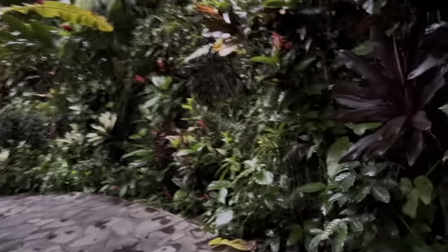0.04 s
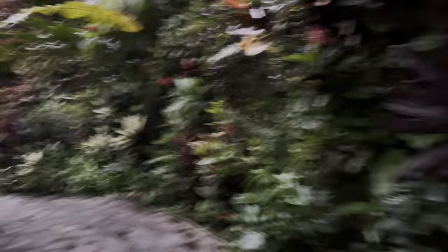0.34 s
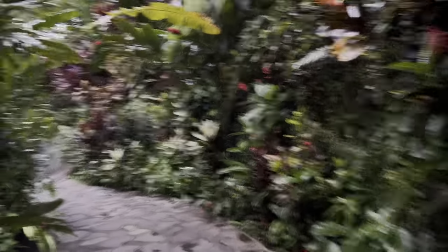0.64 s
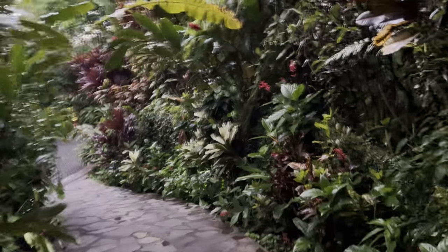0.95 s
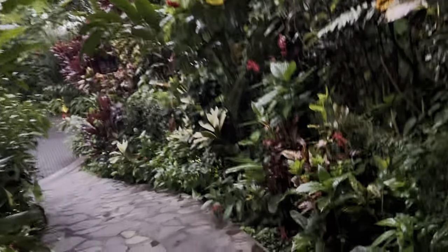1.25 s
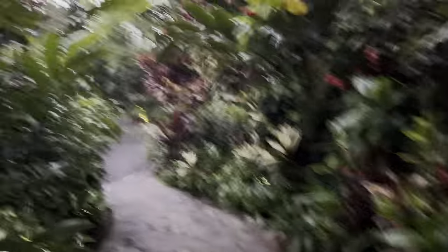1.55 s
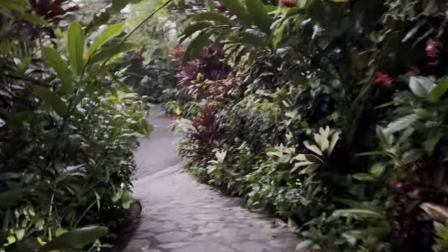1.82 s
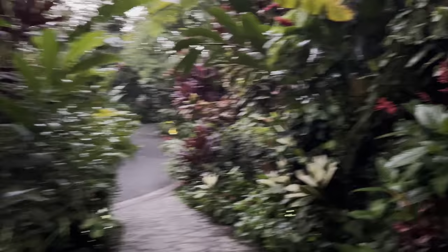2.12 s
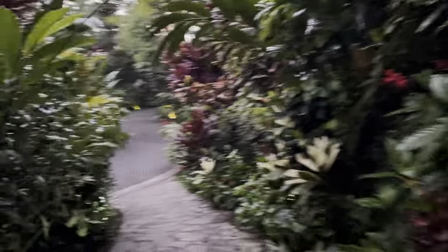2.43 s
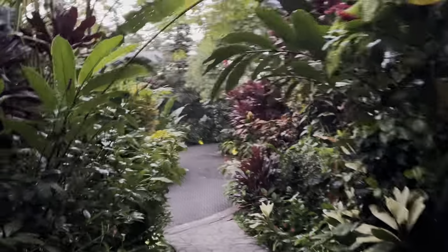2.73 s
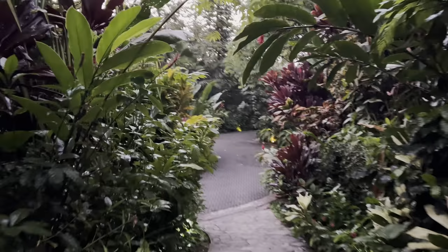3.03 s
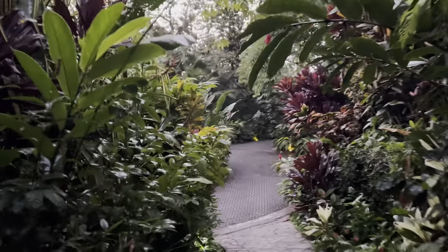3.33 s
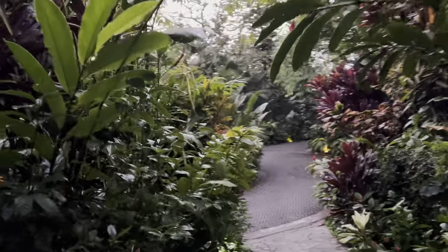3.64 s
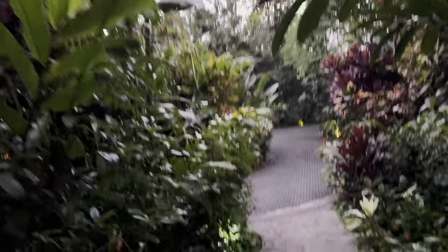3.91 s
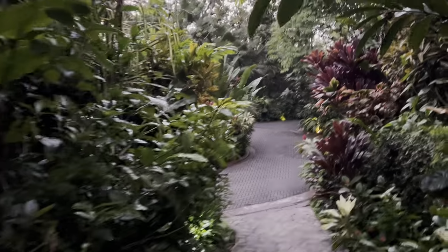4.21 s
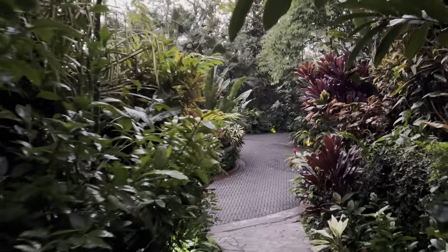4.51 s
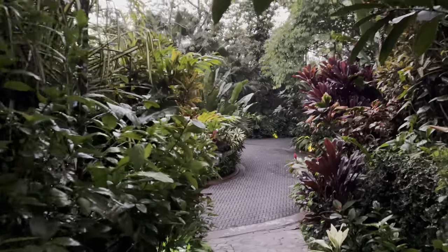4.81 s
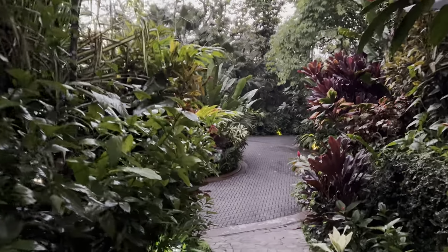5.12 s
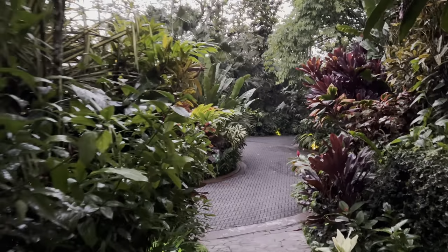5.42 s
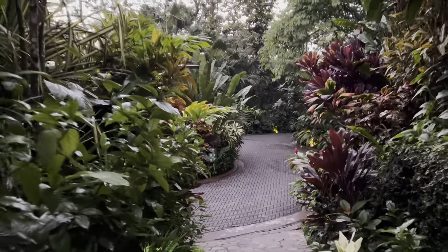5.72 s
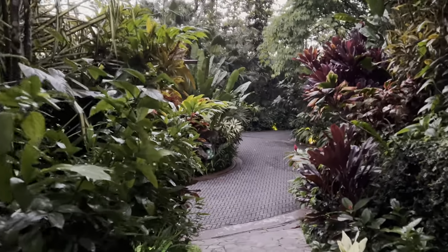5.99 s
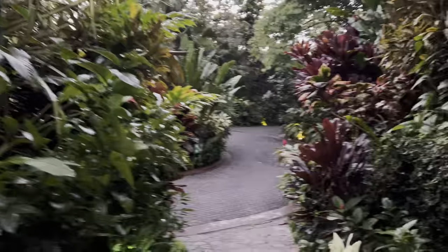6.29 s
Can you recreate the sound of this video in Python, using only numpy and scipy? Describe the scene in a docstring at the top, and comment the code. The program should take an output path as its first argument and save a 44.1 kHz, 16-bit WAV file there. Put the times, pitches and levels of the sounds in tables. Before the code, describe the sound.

A howler monkey roars once in a tropical garden, over a pulsing cicada, small bird chirps and light footsteps on paving.

```python
"""A stroll along a paved path in a tropical garden. From the start a cicada pulses over murmuring air and
far crickets, small birds chip and whistle, and light steps click and scuff. A hand bumps the camera,
then a katydid joins in. Near 4 s a howler monkey roars once: a clean hoot swells and sags, breaks into
a rasp and ends in two short groans, hoots and rasps ringing the same throat. The foliage scatters the
roar and every bird call. A few more chirps and one last soft bump close the scene."""
import sys
import numpy as np
from scipy import signal
from scipy.fft import rfft, irfft, next_fast_len
from scipy.io import wavfile
from scipy.ndimage import uniform_filter1d, map_coordinates

SR = 44100
rng = np.random.default_rng(int(sys.argv[2]) if len(sys.argv) > 2 else 0)


def bounce(signal):
    """Save signal as a 16-bit WAV file at the path given by the first command-line argument."""
    frames = np.transpose(np.atleast_2d(signal))
    limited = np.clip(frames, -1, 1)
    pcm = np.round(limited * 32767).astype(np.int16)
    wavfile.write(sys.argv[1], SR, pcm)


N = 280035

# stereo image of the noise layers: freq_hz, left_right_correlation
EAR_LIKENESS = [(110, 0.84), (380, 0.27), (2400, 0.082), (9000, 0)]
# tone of the outdoor bed: freq_hz, gain_db
AIR_EQ = [(20, -37), (58, 1.5), (100, -5.5), (200, -6), (400, -15.5), (2300, -14.5), (3900, -33.5)]
# drone of far crickets: centre_hz, width_hz, level_db
CRICKET_BANDS = [(2650, 91, -62.5)]
# the cicada's three colours, low to high: freq_hz, gain_db
BUZZ_EQ = [(2300, -14), (3200, 6.5), (4900, 8), (5350, 1.5), (5750, 7.5), (6400, 3.5), (7600, -5.5),
           (8400, -2.5), (10500, -53)]
HISS_EQ = [(2000, -8), (3800, 1.5), (5300, -3.5), (5800, -1.5), (7100, -1), (7750, -8.5), (8300, 3),
           (9300, 1.5), (10500, -10.5), (15000, -33)]
SIZZLE_EQ = [(10000, -36), (11300, 6), (13500, 3), (15300, -7)]
# katydid phrases: start_s, length_s, level_db
KATYDID_CUES = [(2.08, 0.14, -56), (3.559, 0.16, -49), (3.792, 0.27, -50), (4.93, 0.28, -51.5),
                (5.22, 0.29, -49)]
# soft knocks on the camera: start_s, level_db, pitch_hz, t60_s, rattle_width_hz
BUMP_CUES = [(1.374, -40, 137, 0.36, 200), (1.49, -48.5, 72.7, 1, 196), (6.321, -29, 184, 1, 670)]
# soles meeting the paving: time_s, click_db, scuff_db
STEP_CUES = [(.413, -37.5, -60), (0.536, -36, -62), (0.649, -40.5, -60), (0.888, -37, -64),
             (0.977, -42, -55.5), (1.523, -27.5, -50.5), (2.081, -33.5, -52), (2.623, -30, -57),
             (3.184, -39.5, -53), (3.685, -40.5, -54), (5.941, -39, -53)]

# contour of each kind of bird call: offset_s, pitch_hz, gain_db
CHIP_SHAPE = [(0, 4300, -9), (.008, 4070, -3), (.028, 3970, -5), (.052, 3930, -12.5)]
SLUR_SHAPE = [(0, 2430, -19), (.032, 3444, -5.5), (.06, 3484, -3.5), (.1, 3535, -0.5), (.125, 3276, -5),
              (.15, 3060, -16)]
FALL_SHAPE = [(0, 4846, -3), (.016, 5150, -4.5), (.028, 4550, -1), (.04, 3670, -1.5), (.07, 3167, -3),
              (.105, 2590, -14)]
ARCH_SHAPE = [(0, 2650, -8.5), (.04, 2860, -6), (.06, 4096, 6), (.072, 4150, 3), (.084, 3653, 1),
              (.097, 3174, 1), (.115, 2900, -6)]
RISE_SHAPE = [(0, 4350, -7.5), (.032, 5320, -1.5), (.052, 5234, -10.5), (.068, 5900, -5), (.08, 7170, -9)]
THIN_SHAPE = [(0, 6990, -2), (.1, 7330, 1), (.19, 7220, -2)]
# where each kind is sung: start_s, gain_db, pitch_ratio
CHIP_CUES = [(0.16, -33.5, 1.002), (0.328, -35.5, 0.94), (0.855, -35.5, 0.97), (3.32, -33, 1),
             (4.892, -31, 0.98), (5.812, -35.5, 0.95), (6.317, -28.5, 1.01)]
SLUR_CUES = [(1.462, -35, 1), (3.469, -32.5, 1), (4.7, -35, 0.97)]
FALL_CUES = [(2.167, -36.5, 0.97), (4.112, -34.5, 0.98)]
ARCH_CUES = [(2.721, -37.5, 1), (5.988, -37.5, 1.03)]
RISE_CUES = [(5.299, -31, 0.98)]
THIN_CUES = [(2.3, -60, 0.98), (3.019, -58.5, 1)]

# still resonances of the monkey's throat and hyoid sac: centre_hz, width_hz, gain_db
THROAT_MODES = [(345, 155, -5), (401, 61, -1), (550, 120, -10), (1330, 95, -10.5), (2070, 180, -19.5)]
# resonances that move with the lips: centre_hz, width_hz, gain_db
MOUTH_MODES = [(819.3, 99, 0.5), (884, 190, -17.5), (1087, 280, -19.5)]
# mouth opening, which retunes those resonances: time_s, freq_ratio
MOUTH_OPENING = [(4.15, 0.98), (4.26, 1.02), (4.35, 0.96), (4.55, 1), (4.66, 0.95), (4.71, 0.998),
                 (5.45, 0.97), (5.49, 0.92)]
# melody of the vocal folds in the hoots: time_s, pitch_hz
HOOT_PITCH = [(4.02, 396), (4.12, 417.1), (4.33, 422.2), (4.42, 412), (4.46, 384.6), (4.56, 378.7),
              (4.7, 305.5), (4.73, 408.4), (5.21, 404.6), (5.225, 271.7), (5.31, 267.6), (5.385, 244),
              (5.42, 413.8), (5.55, 405), (5.575, 377.2), (5.63, 362)]
# voiced notes, ahead of the throat:
# start_s, length_s, level_db, attack_s, release_s, swell_db_per_s, tilt_db_per_octave,
# second_harmonic_db, shimmer_db
HOOT_CUES = [(4.004, 0.43, -20, 0.23, 0.075, 7.5, 0, 2.3, 0.9),
             (4.438, 0.29, -23.5, 0.018, 0.087, 19, -3, -5, 2.5),
             (4.725, 0.36, -39, 0.023, 0.023, 10, -1.5, 4, 3),
             (5.075, 0.15, -30.5, 0.021, 0.085, -67, -2, -5, 1.5),
             (5.222, 0.17, -26, 0.02, 0.062, 11, -11, 4.5, 1.8),
             (5.416, 0.15, -34, 0.027, 0.035, -13, -6, -1, 3.5),
             (5.552, 0.1, -32.5, 0.013, 0.06, -50, -10, 9.5, 2.2)]
# rough surges of the roar: start_s, hold_s, level_db, bass_db, treble_db
RASP_CUES = [(3.889, 0.039, -38, 5, -6.5), (3.969, 0.034, -39.5, 0.5, -10), (4.025, 0.088, -32.5, 0.5, -3),
             (4.182, 0.22, -37, -9, 5), (4.437, 0.13, -37, 1, 0), (4.6, 0.11, -38.5, 8, 7),
             (4.724, 0.034, -24.5, -5, -3), (4.771, 0.046, -29, 1, 3.5), (4.83, 0.057, -25, -8, -3),
             (4.905, 0.093, -26.5, 2, 0.5), (5.023, 0.033, -25, -5.5, -3.5), (5.077, 0.046, -26.5, 0, -0.5),
             (5.225, 0.14, -40.5, 1.5, 2.5), (5.41, 0.052, -31, -2.5, -6), (5.472, 0.05, -31, -6.5, -10),
             (5.536, 0.054, -38, 0, -11)]
# balance of the roar between the ears: freq_hz, left_over_right_db
ROAR_PAN = [(330, 3.5), (378, -4.5), (418, 7), (520, -1.5), (830, 1.5), (2100, -1.5)]


def amp(db):
    """Decibels to gain."""
    return 10 ** (np.asarray(db) / 20)


def unit(x):
    """Scale to rms 1."""
    return x / np.sqrt(np.mean(x ** 2) + 1e-20)


def along(points, hz):
    """Read (freq_hz, value) points on a log frequency axis."""
    freqs, values = np.transpose(points)
    return np.interp(np.log(hz + 1), np.log(freqs + 1), values)


def curves(rows, t):
    """Automation lanes: each column after the time, read at the times t."""
    times, *columns = np.transpose(rows)
    return [np.interp(t, times, column) for column in columns]


def clock(length_s):
    """Sample times over a length."""
    return np.arange(int(length_s * SR)) / SR


def wobble(rate, count=N):
    """A smooth random curve, rate knots a second."""
    knots = rng.standard_normal(int(count * rate / SR) + 4)
    return map_coordinates(knots, [np.arange(count) * rate / SR])


def fade(t, edge_s):
    """Soft ends for a note."""
    return np.sin(np.pi / 2 * np.clip(np.minimum(t - t[0], t[-1] - t) / edge_s, 0, 1)) ** 2


def pan(left_db):
    """Left and right gains."""
    return amp([[left_db / 2], [-left_db / 2]])


def add(track, start_s, x):
    """Mix x into the track."""
    part = track[..., max(round(start_s * SR), 0):][..., :x.shape[-1]]
    part += x[..., :part.shape[-1]]


def filtered(x, response):
    """Pass x through a frequency response."""
    n = x.shape[-1]
    padded = next_fast_len(n + SR // 2)
    return irfft(rfft(x, padded) * response(np.fft.rfftfreq(padded, 1 / SR)), padded)[..., :n]


def peak(hz, centre, width):
    """Gain of a steep-sided resonance."""
    return 1 / (1 + (2 * (hz - centre) / width) ** 2)


def causal(gain):
    """The response with this gain that rings only after it is struck."""
    cepstrum = irfft(np.log(gain + 1e-6))
    half = len(cepstrum) // 2
    return np.exp(rfft(cepstrum * np.r_[1, np.full(half - 1, 2), 1, np.zeros(half - 1)]))


def stereo_noise(response):
    """Shaped noise of rms 1, narrow in the bass and wide in the treble."""
    def mid_side_gains(hz):
        angle = np.arccos(np.clip(along(EAR_LIKENESS, hz), -1, 1)) / 2
        return response(hz) * np.array([np.cos(angle), np.sin(angle)])
    mid, side = filtered(rng.standard_normal((2, N)), mid_side_gains)
    return unit(np.array([mid + side, mid - side]))


def eq_noise(eq):
    """Stereo noise coloured by an EQ curve."""
    return stereo_noise(lambda hz: amp(along(eq, hz)))


def foliage(x, t60_s, wet_db, echoes_per_s):
    """The direct sound and many separate echoes off trunks and leaves, different at each ear."""
    t = clock(.6)
    echoes = rng.standard_normal((2, len(t))) * amp(-60 * t / t60_s)
    echoes *= rng.random((2, len(t))) < echoes_per_s / SR
    echoes *= amp(wet_db) / np.linalg.norm(echoes, axis=1, keepdims=True)
    echoes[:, 0] += 1  # direct path
    return signal.fftconvolve(x[None], echoes, axes=1) / np.sqrt(1 + amp(2 * wet_db))


def garden_bed(air_db=-54.5, hum_hz=118.7, nearing_db_per_s=2.5):
    """Murmuring air, wavering far crickets and a distant machine whose hum grows as the walker nears."""
    t = np.arange(N) / SR
    air = amp(air_db + wobble(4.77)) * eq_noise(AIR_EQ)
    hum_db = -75 + nearing_db_per_s * t + 0.76 * wobble(3.5)
    hum = np.sqrt(2) * amp(hum_db) * np.sin(2 * np.pi * hum_hz * t)
    crickets = sum(amp(db) * unit(amp(wobble(7))) * stereo_noise(lambda hz: peak(hz, centre, width))
                   for centre, width, db in CRICKET_BANDS)
    return air + hum + crickets


def cicada(first_buzz_s=0.4, period_s=.805, sizzle_lead_s=0.029, approach_db=3.5):
    """The song swings between a low buzz and a sizzling high hiss, and grows as the walker nears."""
    def swing(t):
        return (1 + np.tanh(2 * np.cos(2 * np.pi * (t - first_buzz_s) / period_s))) / 2
    t = np.arange(N) / SR
    buzz_gain = swing(t) * amp(-51 + 0.49 * wobble(16))
    buzz = buzz_gain * stereo_noise(lambda hz: amp(along(BUZZ_EQ, hz)) * hz ** 2 / (hz ** 2 + 1500 ** 2))
    hiss = amp(-53 - 5 * swing(t) + 1.4 * wobble(28)) * eq_noise(HISS_EQ)
    sizzle = amp(-62 - 8 * swing(t + sizzle_lead_s) ** 2) * eq_noise(SIZZLE_EQ)
    return (buzz * pan(5.1) + hiss * pan(3.1) + sizzle) * amp(approach_db * (t / t[-1] + 0.5))


def katydid(pulse_hz=14, rasp_hz=14600):
    """Short, very high rasps in quick, uneven pulses."""
    strokes = np.zeros(N)
    for start, length, db in KATYDID_CUES:
        t = clock(length)
        add(strokes, start, amp(db - 3 - 3 * np.cos(2 * np.pi * pulse_hz * t)) * fade(t, .025))
    return strokes * amp(2.2 * wobble(26)) * stereo_noise(lambda hz: peak(hz, rasp_hz, width=1500))


def bumps(rattle_db=2, attack_s=0.0038):
    """A hand knocks the camera: a low ring and a dull rattle that dies sooner."""
    out, t = np.zeros(N), clock(0.33)
    for start, db, pitch, t60, width in BUMP_CUES:
        rumble = stereo_noise(lambda hz: peak(hz, 72, width) * hz ** 2 / (hz ** 2 + 50 ** 2))
        rattle = amp(rattle_db - 60 * t / t60) * rumble[0, :len(t)]
        ring = np.sin(2 * np.pi * pitch * t)
        envelope = amp(db - 60 * t / t60) * (1 - np.exp(-t / attack_s))
        add(out, start, envelope * (ring + rattle))
    return out


def footsteps(click_hz=1400, thud_hz=130, sink_s=0.00146, scuff_s=0.086,
              grit_hz=790, grit_db=-45, grit_spread_s=0.11):
    """Each sole lands with a click that sinks into a small thud, scuffs as it rolls and stirs grit."""
    contacts = [(time, db, click_hz) for time, db, _ in STEP_CUES]
    for time, *_ in STEP_CUES:
        for when, force, tone in rng.standard_normal((2, 3)):  # two grit ticks a step
            contacts.append((time + grit_spread_s * when, grit_db + 3 * force, grit_hz * amp(3.25 * tone)))
    taps, t = np.zeros(N), clock(.1)
    click_decay = amp(-60 * t / .008)
    thud_decay = amp(-11 - 60 * t / .095)
    envelope = (click_decay + thud_decay) * (1 - np.exp(-t / .0003))
    for start, db, sweep_hz in contacts:
        pitch = thud_hz + sweep_hz * np.exp(-t / sink_s)
        add(taps, start, amp(db) * envelope * np.sin(2 * np.pi * np.cumsum(pitch) / SR))
    now = np.arange(N) / SR
    rub = sum(amp(db) * np.exp(-((now - time) / scuff_s) ** 2) for time, _, db in STEP_CUES)
    grain = unit(amp(5 * wobble(120)))
    return taps + rub * grain * stereo_noise(lambda hz: peak(hz, centre=510, width=1760))


def bird(shape, cues, t60_s, wet_db, left_db, waver=0.014, trill=0, trill_hz=125):
    """One whistled contour, plain or trilled, retuned for each cue and given fresh echoes."""
    out, t = np.zeros((2, N)), clock(shape[-1][0])
    pitch, contour_db = curves(shape, t)
    for start, db, ratio in cues:
        bend = waver * wobble(298.6, len(t)) + trill * np.cos(2 * np.pi * trill_hz * t)
        phase = 2 * np.pi * np.cumsum(pitch * ratio * (1 + bend)) / SR
        call = np.sqrt(2) * amp(db + contour_db) * np.sin(phase) * fade(t, 0.00076)
        add(out, start, foliage(call, t60_s, wet_db, echoes_per_s=2500))
    return out * pan(left_db)


def birds():
    """Sharp chips from deep in the bushes, whistles from the trees on the left, thin notes far off."""
    chips = amp(4) * bird(CHIP_SHAPE, CHIP_CUES, t60_s=0.41, wet_db=8, left_db=5, waver=.016, trill=.04)
    slurs = bird(SLUR_SHAPE, SLUR_CUES, t60_s=0.5, wet_db=8.5, left_db=5)
    sweep_calls = [(FALL_SHAPE, FALL_CUES), (ARCH_SHAPE, ARCH_CUES), (RISE_SHAPE, RISE_CUES)]
    sweeps = sum(bird(shape, cues, t60_s=0.53, wet_db=9.5, left_db=6) for shape, cues in sweep_calls)
    thin_notes = bird(THIN_SHAPE, THIN_CUES, t60_s=0.97, wet_db=4, left_db=11, waver=0.034)
    return chips + slurs + sweeps + thin_notes


def throat(hz, opening):
    """Gain of the throat, the hyoid sac and the mouth at a given opening, rolled off at both ends."""
    modes = list(THROAT_MODES) + [(centre * opening, width, db) for centre, width, db in MOUTH_MODES]
    power = sum((amp(db) * peak(hz, centre, width)) ** 2 for centre, width, db in modes)
    return np.sqrt(power) / (1 + (200 / (hz + 1)) ** 6) / (1 + (hz / 2300) ** 16)


def rasps(fold_hz=136, jitter=.06, noise_share=.28, shudder_db=1.7, attack_s=0.024, fall_db_per_s=253):
    """The folds break into slow, uneven slaps, each with a puff of turbulence, and ring the throat."""
    out = np.zeros(N)
    for start, hold, db, bass_db, treble_db in RASP_CUES:
        t = clock(hold + .2)
        cycles = np.cumsum(fold_hz * (1 + jitter * wobble(110, len(t)))) / SR
        slaps = np.diff(np.floor(cycles), prepend=0) * amp(4 * wobble(fold_hz, len(t)))
        puffs = rng.standard_normal(len(t)) * (1 + np.cos(2 * np.pi * cycles)) ** 2
        flow = np.sqrt(1 - noise_share) * unit(slaps) + np.sqrt(noise_share) * unit(puffs)
        opening, = curves(MOUTH_OPENING, start + hold / 2)
        eq = [(430, bass_db), (490, -4), (570, 2), (680, 0), (920, 0), (1050, treble_db)]
        voice = unit(filtered(flow, lambda hz: causal(throat(hz, opening) * amp(along(eq, hz)))))
        # steady lung pressure holds the strength even over a few slaps
        voice /= np.sqrt(np.abs(uniform_filter1d(voice ** 2, size=750)) + 1e-6)
        shudder = unit(amp(shudder_db * np.clip(wobble(86.3, len(t)), -2, 1)))
        envelope = np.clip(t / attack_s, 0, 1) * amp(db - fall_db_per_s * np.maximum(t - hold, 0))
        add(out, start, voice * shudder * envelope)
    return out


def hoots(effort_db_per_octave=13.5, sag_tilt_db=20.5, edge_db=7, flutter_db=3, jitter_per_db=0.007):
    """Vibrating folds: harmonics slide through the throat, brighter with effort and as the note sags."""
    out = np.zeros(N)
    for start, length, db, attack, release, swell, tilt_db, second_db, shimmer_db in HOOT_CUES:
        t = clock(length)
        pitch, = curves(HOOT_PITCH, start + t)
        opening, = curves(MOUTH_OPENING, start + t)
        effort = np.sin(np.pi / 2 * np.clip(np.minimum(t / attack, (length - t) / release), 0, 1))
        jitter = jitter_per_db * shimmer_db * wobble(150.5, len(t))
        phase = 2 * np.pi * np.cumsum(pitch * (1 + jitter)) / SR
        sag_octaves = np.maximum(np.log2(np.median(pitch) / pitch), 0)
        slope_db = tilt_db + effort_db_per_octave * (effort - 1) + sag_tilt_db * sag_octaves
        note_db = db + swell * (t - length / 2)
        for k in range(1, 8):
            harmonic_db = note_db + np.log2(k) * slope_db + shimmer_db * wobble(51, len(t))
            if k == 2:
                harmonic_db += second_db
            if k > 3:
                harmonic_db += -7 + flutter_db * wobble(153, len(t))
                # a sagging note gains edge: the fourth harmonic ducks, those above it lift
                harmonic_db += edge_db * np.tanh(20 * sag_octaves) * np.sign(k - 4.5)
            gain = amp(harmonic_db) * effort ** 1.28 * throat(k * pitch, opening)
            add(out, start, np.sqrt(2) * gain * np.sin(k * phase))
    return out


def howler_monkey(left_lead_s=0.00005):
    """The roar arrives through the trees, a little from the left, and lingers among them."""
    hoarse = foliage(rasps(), t60_s=.1, wet_db=1, echoes_per_s=3000)[:, :N]
    clean = foliage(hoots(), t60_s=.12, wet_db=-17, echoes_per_s=1500)[:, :N]
    roar = np.array([foliage(side, t60_s=1, wet_db=-14, echoes_per_s=600)[0, :N]
                     for side in hoarse + clean])
    ears = np.array([[.5], [-.5]])
    def placement(hz):
        return np.exp(2j * np.pi * hz * left_lead_s * ears) * amp(along(ROAR_PAN, hz) * ears)
    return filtered(roar, placement)


def scene():
    """The full mix, heard from the path."""
    return howler_monkey() + birds() + footsteps() + bumps() + cicada() + katydid() + garden_bed()


def record(dry, top_hz=15750):
    """A brick-wall high cut on the mix."""
    return filtered(dry, lambda hz: hz < top_hz)


dry = scene()
out = record(dry)
bounce(out)
```